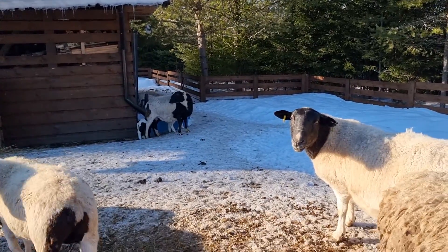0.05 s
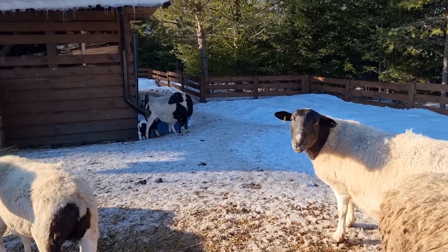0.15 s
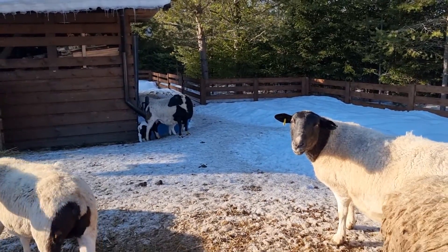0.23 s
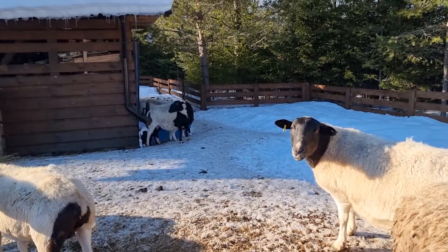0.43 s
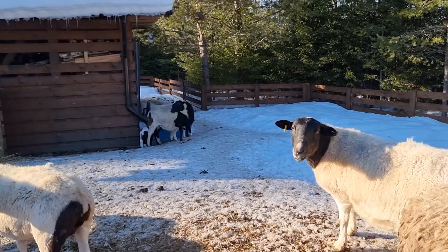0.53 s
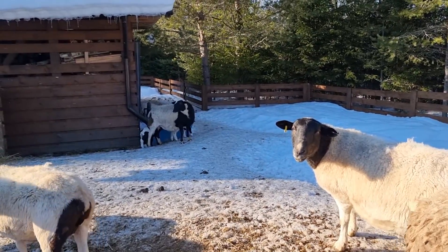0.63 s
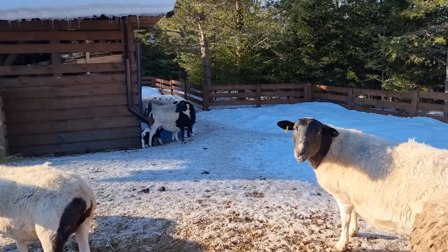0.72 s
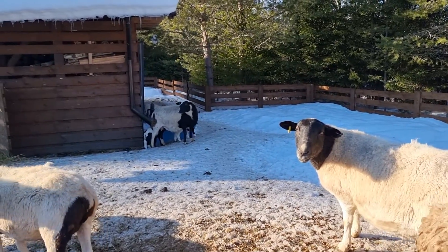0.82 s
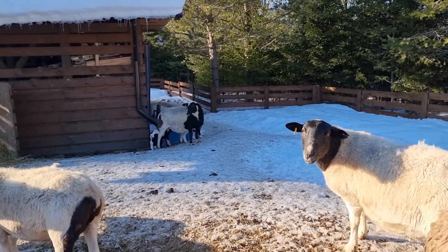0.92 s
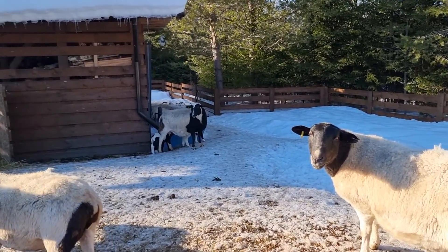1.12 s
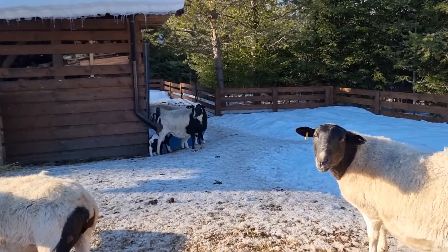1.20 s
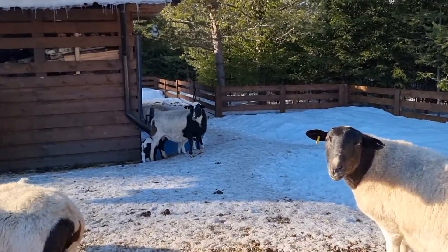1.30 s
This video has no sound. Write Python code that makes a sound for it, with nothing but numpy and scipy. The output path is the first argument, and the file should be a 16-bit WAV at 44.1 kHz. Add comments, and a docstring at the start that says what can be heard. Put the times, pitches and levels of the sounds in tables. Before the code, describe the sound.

A sheep bleats once, close and slightly left. It opens with creaky grunts, then from about 0.2 seconds becomes a low, rough voice with a fast throb. At 0.7 seconds it breaks into a thinner, higher, quieter tone, ending near 1 second. Hooves crunch faintly on snow, mostly from 1 to 1.3 seconds. A soft rumble of air lies underneath, with very little echo.

```python
"""A sheep in a snowy farmyard

A sheep bleats once, close by and a little to the left. Creaky grunts catch into a low, rough voice
that throbs twelve times a second, then breaks into a thin high register; in both, pulses from the
vocal folds ring the resonances of throat and mouth. Snow crunches faintly under hooves, and a shed
and a fence answer weakly over a low rumble of air."""
import sys
import numpy as np
from scipy import signal
from scipy.fft import rfft, irfft, next_fast_len
from scipy.io import wavfile
from scipy.ndimage import uniform_filter1d

SR = 44100
rng = np.random.default_rng(int(sys.argv[2]) if len(sys.argv) > 2 else 0)


def to_wav(sig):
    """Store sig (one row per channel, or 1-D mono) as 16-bit WAV at the path in sys.argv[1].

    Samples outside -1..1 are clipped; the rate is SR.
    """
    pcm = np.clip(np.atleast_2d(sig), -1, 1) * 32767
    pcm = np.round(pcm).astype(np.int16)
    wavfile.write(sys.argv[1], SR, pcm.T)  # frames by channels


N = 59535


def amp(db):
    """Decibels to amplitude ratio."""
    return 10 ** (np.asarray(db) / 20)


def unit(x):
    """Normalisation to rms 1."""
    return x / np.sqrt(np.mean(x ** 2) + 1e-20)


def steady(x):
    """Normalisation by the running rms over a few voice cycles."""
    power = uniform_filter1d(uniform_filter1d(x ** 2, size=740), size=500)
    return x / np.sqrt(np.abs(power) + 1e-4)


def along(points, hz):
    """Interpolation of (frequency_hz, value) points on a log frequency axis."""
    f, v = np.transpose(points)
    return np.interp(np.log(hz + 1), np.log(f + 1), v)


def curves(rows):
    """Linear interpolation, per sample, of each column after the time."""
    s, *cols = np.transpose(rows)
    return [np.interp(np.arange(N) / SR, s, c) for c in cols]


def gains(rows):
    """Amplitude envelopes from level curves, fading out within 10 ms beyond their ends."""
    t = np.arange(N) / SR
    gate = np.clip(1 + np.minimum(t - rows[0][0], rows[-1][0] - t) / .01, 0, 1)
    return [gate * amp(db) for db in curves(rows)]


def filtered(x, response):
    """Linear filtering: the spectrum of x times a complex frequency response."""
    m = next_fast_len(N + SR // 2)
    return irfft(rfft(x, m) * response(np.fft.rfftfreq(m, 1 / SR)), m)[..., :N]


def noise(colour):
    """Spectral shaping: noise of rms 1 with a (frequency_hz, level_db) spectrum."""
    return unit(filtered(rng.standard_normal(N), lambda hz: amp(along(colour, hz))))


def burst(start_s, rise_s, t60_s):
    """Transient envelope: a quick rise and an exponential decay."""
    t = np.maximum(np.arange(N) / SR - start_s, 0)
    return (1 - np.exp(-t / rise_s)) * amp(-60 * t / t60_s)


def air(hiss_db=-63):
    """Partial coherence: the two microphones share some of the air's low rumble and faint hiss."""
    # strength of the rumble: time_s, level_db
    rumble_level = [(0, -50), (.7, -67), (.95, -63), (1.35, -63)]
    # spectrum of the rumble: frequency_hz, level_db
    rumble_colour = [(25, -32.5), (50, -5.5), (75, 4), (110, -1), (200, -11.5), (400, -29), (900, -36.5)]
    # spectrum of the hiss: frequency_hz, level_db
    hiss_colour = [(150, -19), (400, -6), (800, -8.5), (1400, -12), (2500, -6.5), (5000, -5), (7500, -9.5),
                   (10500, -26.5), (15500, -11.5)]

    def pair(colour, shared):
        return unit(shared * noise(colour) + np.array([noise(colour), noise(colour)]))

    rumble = amp(curves(rumble_level)[0]) * pair(rumble_colour, shared=1.0)
    return rumble + amp(hiss_db) * pair(hiss_colour, shared=0.4)


def snow():
    """Impact noise: snow crunches under hooves in decaying bursts of gritty, band-limited noise."""
    # crunches and scuffs: start_s, level_db, centre_hz, width_octaves, t60_s
    crunches = [(.107, -47, 7000, 0.92, 0.026), (0.546, -23.5, 413, 1, 0.074), (0.678, -42, 9250, 3, 0.054),
                (0.818, -17, 6300, 0.25, 0.0098), (1.012, -58, 3940, 0.48, 0.19),
                (1.059, -47, 3000, 1.2, 0.026), (1.066, -58, 225.8, 1.4, 0.058),
                (1.144, -45.5, 2800, 0.5, 0.04), (1.15, -45, 4630, 0.653, 0.038),
                (1.172, -42.5, 3600, 0.35, 0.021), (1.199, -48.5, 5500, 0.57, 0.044),
                (1.208, -43, 1880, 1.3, 0.028), (1.21, -61.5, 643, 0.11, 0.13),
                (1.266, -50, 4550, 1.01, 0.02), (1.278, -41.5, 5970, .5, .012),
                (1.319, -63.5, 833, 0.26, 0.057), (1.34, -53.5, 860, 0.2, 0.028)]
    out = np.zeros((2, N))
    for start, db, centre, octaves, t60 in crunches:
        grit = rng.standard_normal((2, N)) * rng.exponential(size=N)
        grit = unit(filtered(grit, lambda hz: (1 + (np.log2((hz + 1) / centre) / octaves) ** 2 / 2) ** -2))
        out += amp(db) * burst(start, rise_s=.001, t60_s=t60) * grit
    return out


def yard(x, tail_db=-22.5):
    """Reverberation: early scatter from ground and flock, and a weak tail from shed and fence."""
    # decay time of the tail: frequency_hz, t60_s
    decay = [(200, 0.23), (2000, 0.22), (10000, 0.094)]
    # spectrum of the early scatter: frequency_hz, gain_db
    near_colour = [(200, -18), (1600, -6), (3500, 0.5), (7000, -3.5)]

    def echo(impulse):
        return signal.fftconvolve(x[None], impulse / np.linalg.norm(impulse[0]), axes=1)[:, :N]

    hz, t, spectra = signal.stft(rng.standard_normal((2, SR // 2)), SR, nperseg=256)
    tail = signal.istft(spectra * amp(-60 * t / along(decay, hz)[:, None]), SR, nperseg=256)[1]
    near = rng.standard_normal(tail.shape) * burst(0.0025, rise_s=0.00026, t60_s=0.021)[:tail.shape[1]]
    return amp(tail_db) * echo(tail) + filtered(echo(near), lambda hz: amp(along(near_colour, hz)))


def grunts(rise_s=0.0024, rasp_db=-1, ring_hz=172, ring_db=-7, squeak_hz=980, squeak_db=-24.5):
    """Damped oscillation: each slow, slack flap of the throat gives a rasp and a low ring."""
    # creaky flaps before the voice: start_s, relative_level_db
    flaps = [(.001, -31), (.016, -28), (.036, -32), (0.064, -31.5), (.089, -28.5), (0.106, -26.5),
             (0.11, -46.5), (0.122, -27.5), (0.13, -27.5), (0.193, -30.5), (0.211, -30.5), (0.224, -25.5)]
    # spectrum of the rasp: frequency_hz, level_db
    rasp_colour = [(150, -43), (250, -27), (387, -12.5), (580, 0), (991, 5), (1830, -3.5), (2160, -23),
                   (2380, -14), (3560, -35.5), (4840, -26), (12000, -49.5), (15600, -70), (22000, -120)]
    t = np.arange(N) / SR
    rasp_power, ring = np.zeros((2, N))
    for start, db in flaps:
        rasp_power += (amp(db) * burst(start, rise_s, t60_s=0.066)) ** 2
        ring += amp(db) * burst(start, rise_s, t60_s=0.095) * np.sin(2 * np.pi * ring_hz * (t - start))
    rasp = np.sqrt(rasp_power) * noise(rasp_colour)
    # one grunt ends in a short tone
    squeak = np.exp(-((t - 0.11) / 0.0023) ** 2) * np.sin(2 * np.pi * squeak_hz * t)
    return amp(squeak_db) * squeak + amp(rasp_db) * rasp + amp(ring_db) * ring


def cycles(pitch, start_s):
    """Phase as the integral of frequency: vocal fold cycles counted from start_s."""
    turns = np.cumsum(curves(pitch)[0]) / SR
    return turns - np.interp(start_s * SR, np.arange(N), turns)


def folds(turns, jitter_s, shimmer_db, catch_end_s=0, weak_db=-26, strong_db=2):
    """Glottal source: one sharp pulse per cycle, uneven in time (jitter) and size (shimmer)."""
    # roughness, high in the throb, clearing, then fraying at the end: time_s, scatter_factor
    roughness = [(.42, .9), (.47, 1.4), (.57, 1.5), (.62, .4), (.8, .3), (.85, 1.0)]
    cycle = np.arange(np.ceil(turns[0]), turns[-1])
    even_s = np.interp(cycle, turns, np.arange(N) / SR)
    scatter = rng.standard_normal((len(cycle), 2)) * np.interp(even_s, *np.transpose(roughness))[:, None]
    pulse_s = even_s + jitter_s * scatter[:, 0]
    # while the voice catches, every third pulse is weak
    catch_db = (pulse_s < catch_end_s) * np.where(np.mod(cycle, 3) == 2, weak_db, strong_db)
    size = amp(shimmer_db * scatter[:, 1] + catch_db)
    # a windowed sinc places each pulse between samples
    taps = np.floor(pulse_s * SR)[:, None] + np.arange(-7, 9)
    offset = taps - pulse_s[:, None] * SR
    shape = np.sinc(offset) * np.cos(np.pi * offset / 16) ** 2
    return np.bincount(np.clip(taps, 0, N - 1).astype(int).ravel(), (size[:, None] * shape).ravel(), N)


def throat_ring(x, formants, ratio):
    """Formant resonance: parallel resonators of alternating sign glide with the mouth's tuning ratio."""
    glide = np.cumsum(ratio) / SR
    out = np.zeros(x.shape)
    for k, (hz, width, db) in enumerate(formants):
        spin = np.exp(2j * np.pi * hz * glide)
        pole = np.exp(-np.pi * width / SR)
        ring = np.real(spin * signal.lfilter([1 - pole], [1, -pole], x * spin.conj()))
        out += (-1) ** k * amp(db) * ring
    return out


def register(pulses, throat, bands, levels, puff_s=0.0025):
    """Source-filter model: pulses and their puffs of air ring the throat; each band swells separately."""
    # the mouth's tuning of the formants: time_s, first_band_ratio, second_band_ratio, upper_bands_ratio
    mouth = [(.24, 0.91, 0.96, 1.005), (.35, 1.043, 1.068, 1.014), (.385, 0.99, 1.108, 1.104),
             (.425, 1.05, 1.05, 1.014), (.46, 1.003, 1.08, 1.03), (.51, 1.1, 1.04, 1.046),
             (.55, 1.06, 1.11, 0.97), (.603, 1.04, 1.07, 1.14), (.65, 1.04, 1.02, 0.98),
             (.695, 0.88, 0.92, 1.04), (.72, .92, 0.99, .83), (.755, 1, .9, 1), (.805, 0.97, .99, 1.057),
             (.85, 1.135, 1.18, 1), (.885, 1.01, 1.07, 1.07), (.92, 1.22, 1.14, 1.075)]
    ratios = curves(mouth)
    puffs = signal.lfilter([1], [1, -np.exp(-1 / (puff_s * SR))], pulses) * rng.standard_normal(N)
    out = np.zeros(N)
    for k, ((low_hz, high_hz, db, share), gain) in enumerate(zip(bands, gains(levels))):
        rung = throat_ring(np.array([pulses, puffs]), throat[k], ratios[min(k, 2)])
        bandpass = signal.butter(2, [low_hz, high_hz], "band", fs=SR, output="sos")
        clean, airy = signal.sosfilt(bandpass, rung)
        blend = np.sqrt(1 - share) * unit(clean) + np.sqrt(share) * unit(airy)
        out += amp(db) * gain * steady(blend)
    return out


def bleat(catch_s=.3052, break_s=.7, bass_db=-3.5):
    """Register break: the folds jump from low to high pitch over a soft fundamental and chest rasp."""
    # fold vibration before the break: time_s, pitch_hz
    low_pitch = [(.22, 177.8), (.245, 174.4), (.28, 160.7), (.31, 182.5), (.34, 178.6), (.352, 149.8),
                 (.38, 165.5), (.398, 164.2), (.409, 198.6), (.425, 151.5), (.45, 158), (.468, 153.9),
                 (.487, 191), (.515, 148.7), (.56, 168.3), (.6, 152.8), (.635, 146.8), (.69, 130.5)]
    # low-register formants, one list per band: centre_hz before tuning, width_hz, relative_db
    low_throat = [
        [(561.7, 51, 3), (715, 150, -5.5), (1107, 280, -6.5)],
        [(1380, 33, -15.5), (1600, 220, 12), (1920, 160, -2), (1900, 94, -10.5)],
        [(2214, 180, 5), (2720, 90, -17.5)],
        [(3276, 200, -0.5), (4360, 99, -7.5), (5560, 380, -3), (6680, 480, -4), (9100, 1600, -15)],
    ]
    # low-register bands, one per level column: low_hz, high_hz, gain_db, noise_share
    low_bands = [(380, 1230, -1, 0.1), (1310, 1774, -1.5, 0), (1946, 3700, -1.5, 0.5),
                 (3040, 9800, -1.5, 0.96)]
    # throb of those bands: time_s, first_db, second_db, third_db, treble_db
    low_levels = [(0.21, -45, -42.5, -69.5, -60), (0.244, -30.5, -20.5, -47.5, -51),
                  (0.258, -37.5, -31.5, -57.5, -64), (0.268, -50, -23, -57, -50.5),
                  (0.28, -51, -39.5, -51.5, -58), (0.298, -34.5, -32.5, -57.5, -61.5),
                  (0.31, -26, -12, -32, -35.5), (0.318, -22, -15.5, -41.5, -50.5),
                  (0.326, -19.5, -7.5, -33.5, -42.5), (0.342, -25, -16.5, -32, -39.5),
                  (0.352, -34.5, -32, -28, -40), (0.366, -55.5, -39.5, -48.5, -50.5),
                  (0.386, -29.5, -17.5, -37, -46), (0.408, -20.5, -12.5, -41, -47.5),
                  (0.42, -24.5, -14, -26, -38.5), (0.428, -34, -27.5, -28.5, -50),
                  (0.438, -44, -38, -39.5, -40.5), (0.448, -47.5, -32, -33.5, -45.5),
                  (0.474, -22, -13.5, -34, -42), (0.488, -21.5, -15.5, -40, -37.5),
                  (0.498, -22, -16, -21, -40.5), (0.51, -39, -35, -29.5, -46.5),
                  (0.534, -44.5, -25.5, -30.5, -43), (0.55, -26, -22.5, -25.5, -46),
                  (0.568, -23.5, -13.5, -34, -38), (0.578, -26.5, -24, -28.5, -55),
                  (0.588, -43, -31.5, -32.5, -41.5), (0.608, -49, -38, -30.5, -52.5),
                  (0.622, -38, -29.5, -29.5, -46.5), (0.648, -24.5, -28.5, -34.5, -62),
                  (0.678, -36, -42.5, -36, -50), (0.71, -49, -45, -53.5, -62)]
    # fold vibration after the break: time_s, pitch_hz
    high_pitch = [(.7, 244), (.72, 264.8), (.742, 294.3), (.756, 261.7), (.78, 296.9), (.803, 299.1),
                  (.83, 212), (.848, 232.4), (.865, 277.9), (.885, 293.2), (.908, 205.7), (.925, 208),
                  (.942, 245.6), (.97, 195.5)]
    # high-register formants, one list per band: centre_hz before tuning, width_hz, relative_db
    high_throat = [
        [(605, 140, -1), (760, 93, -13), (1105, 70, -16.5), (1490, 99, -5)],
        [(1917, 194, 0)],
        [(3150, 450, -1), (3530, 170, 1.5)],
        [(3970, 250, 0)],
        [(5070, 790, 2), (7000, 230, -0.5), (8080, 260, -7.5), (10020, 440, -10), (13400, 900, -10.5)],
    ]
    # high-register bands, one per level column: low_hz, high_hz, gain_db, noise_share
    high_bands = [(467, 1350, 0, 0.13), (1480, 2220, 0, 0.11), (2750, 3700, 0, 0.069),
                  (3800, 5300, 0, 0.21), (4700, 17000, 0.00083, 0.13)]
    # swell of those bands: time_s, first_db, second_db, third_db, fourth_db, treble_db
    high_levels = [(0.699, -35.5, -58, -51, -56, -55), (0.714, -51, -55, -52, -66, -57),
                   (0.735, -40.5, -46, -45, -59, -56.5), (0.751, -59, -48.5, -46, -58, -66),
                   (0.773, -47, -43, -36, -56, -49.5), (0.806, -34.5, -32.5, -31, -41.5, -42.5),
                   (0.817, -41, -45, -32.5, -58, -41.5), (0.831, -50, -46, -46, -42.5, -50.5),
                   (0.846, -46, -39, -42, -47.5, -55), (0.857, -38.5, -38.5, -35, -41.5, -44.5),
                   (0.874, -32.5, -36.5, -32.5, -41, -47), (0.89, -36, -36.5, -36.5, -44.5, -41.5),
                   (0.9, -48, -47.5, -46.5, -45, -51.5), (0.918, -54, -47, -52, -48, -49.5),
                   (0.934, -37, -46.5, -43, -48.5, -53), (0.949, -45.5, -46, -46, -57, -53.5),
                   (0.964, -49.5, -68, -65, -65, -64), (0.98, -56, -73, -66, -67, -81)]
    # envelope of the voice's bass: time_s, relative_level_db
    chest_level = [(0.2, -62.5), (0.238, -44), (0.284, -61), (0.312, -49), (0.334, -45), (0.366, -48.5),
                   (0.416, -44), (0.446, -56.5), (0.486, -42), (0.522, -56.5), (0.552, -36.5), (0.598, -58),
                   (0.646, -40.5), (0.688, -52), (0.73, -43.5), (0.828, -57.5), (0.966, -58), (0.99, -74)]
    # spectrum of the chest rasp: frequency_hz, level_db
    chest_colour = [(30, -25.5), (80, -0.5), (130, -4), (250, -4.5), (400, -14), (800, -32.5)]
    low_turns, high_turns = cycles(low_pitch, catch_s), cycles(high_pitch, break_s)
    low_pulses = folds(low_turns, jitter_s=.00015, shimmer_db=2.25, catch_end_s=.362)
    voice = register(low_pulses, low_throat, low_bands, low_levels)
    high_pulses = folds(high_turns, jitter_s=.00003, shimmer_db=1.9)
    voice += register(high_pulses, high_throat, high_bands, high_levels)
    broken = np.clip((np.arange(N) / SR - break_s) / 0.015 + .5, 0, 1)  # 15 ms crossfade
    fundamental = (1 - broken) * np.sin(2 * np.pi * low_turns) + broken * np.sin(2 * np.pi * high_turns)
    bass = unit(fundamental) + noise(chest_colour)
    return voice + amp(bass_db) * gains(chest_level)[0] * bass


def scene():
    """Superposition: the sheep, placed left by time and level cues, its echo, the snow and the air."""
    # earlier arrival at the left microphone: frequency_hz, lead_s
    lead = [(200, 0.00059), (580, 0.00044), (1650, 0.00039), (2350, 0.00048), (3400, 0.000472),
            (6000, 0.000428), (12000, 0.000309)]
    # level balance of the microphones: frequency_hz, left_minus_right_db
    balance = [(180, -0.5), (380, 4.5), (700, 3.5), (1300, 0.6), (2400, -1.4), (4400, -4), (15000, 0)]
    side = np.array([[.5], [-.5]])

    def direction(hz):
        return amp(side * along(balance, hz)) * np.exp(2j * np.pi * hz * side * along(lead, hz))

    sheep = bleat() + grunts()
    return filtered(sheep, direction) + yard(sheep) + snow() + air()


def record(dry, top_hz=15850):
    """Band limiting: an ideal low-pass filter keeps nothing above top_hz."""
    return filtered(dry, lambda hz: hz < top_hz)


dry = scene()
out = record(dry)
to_wav(out)
```